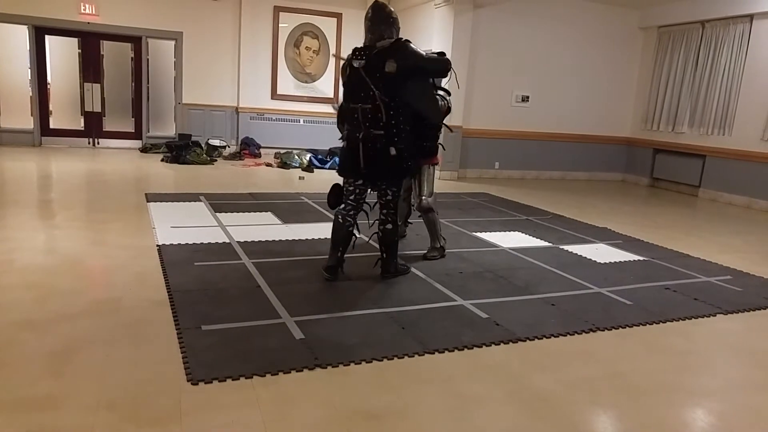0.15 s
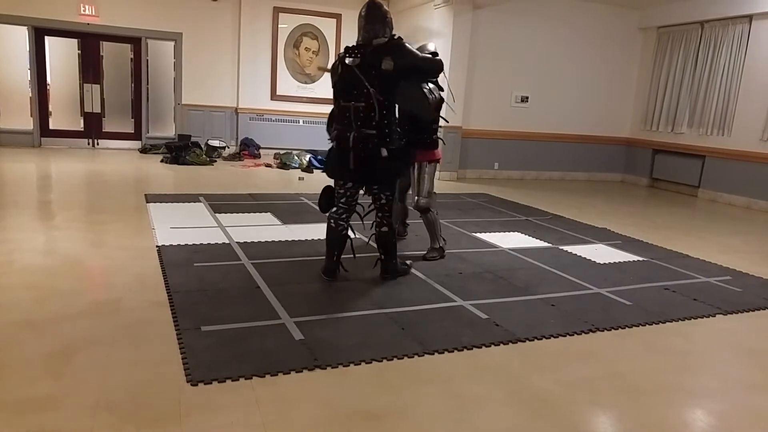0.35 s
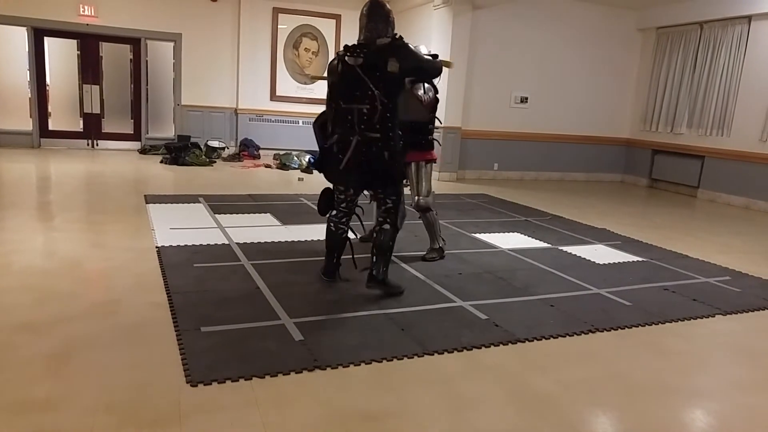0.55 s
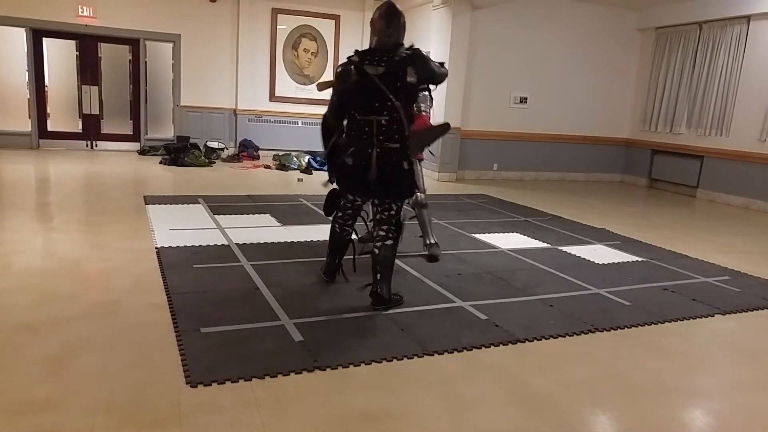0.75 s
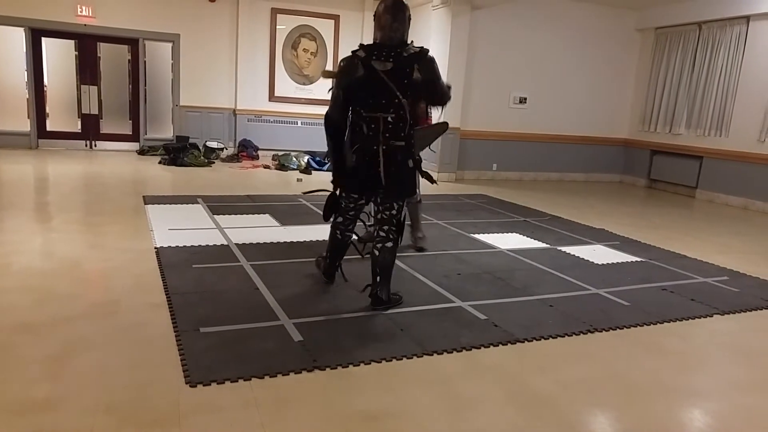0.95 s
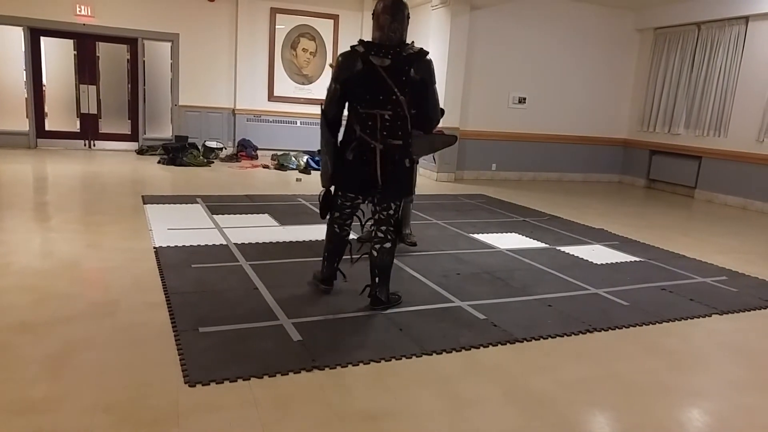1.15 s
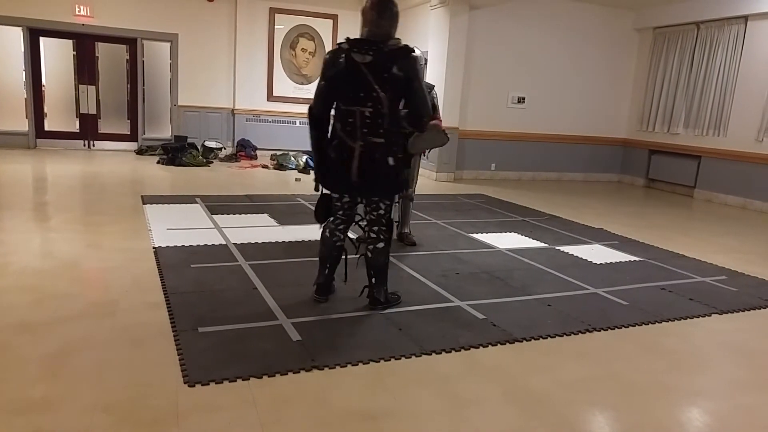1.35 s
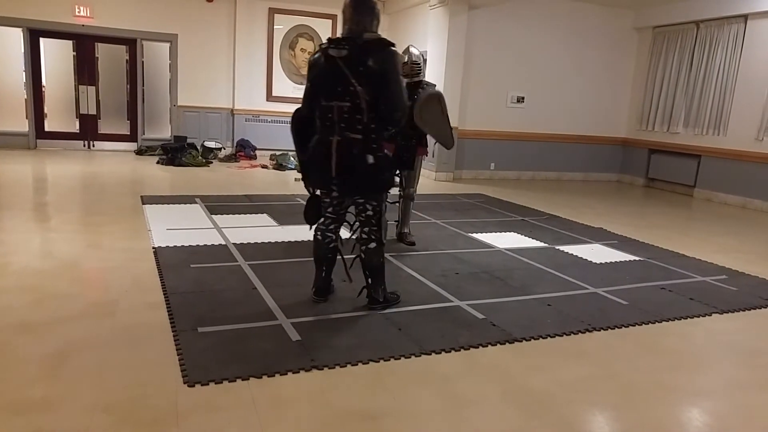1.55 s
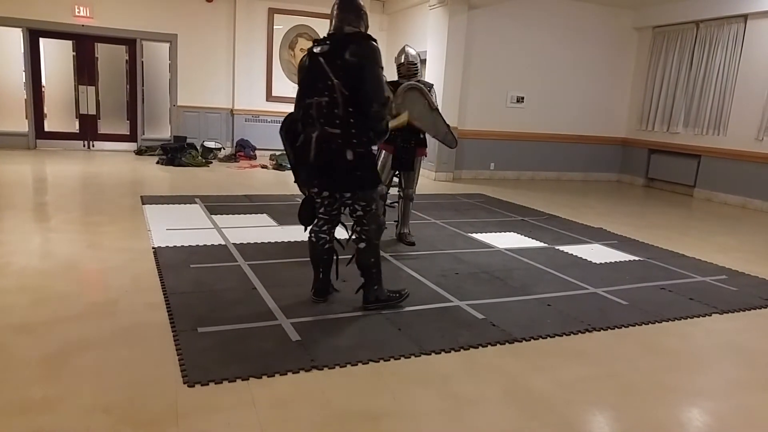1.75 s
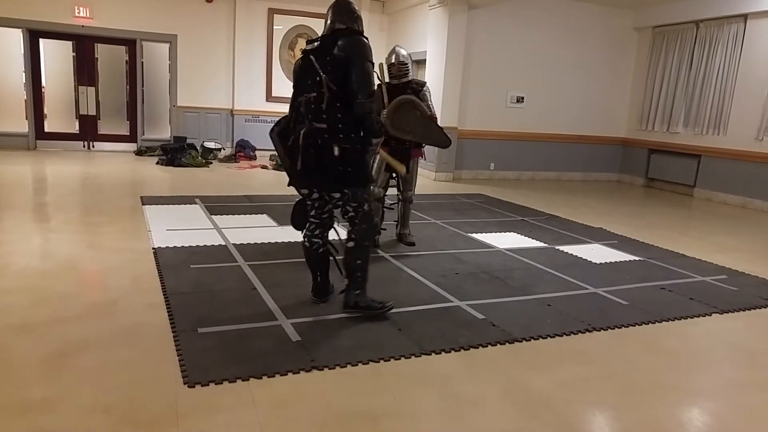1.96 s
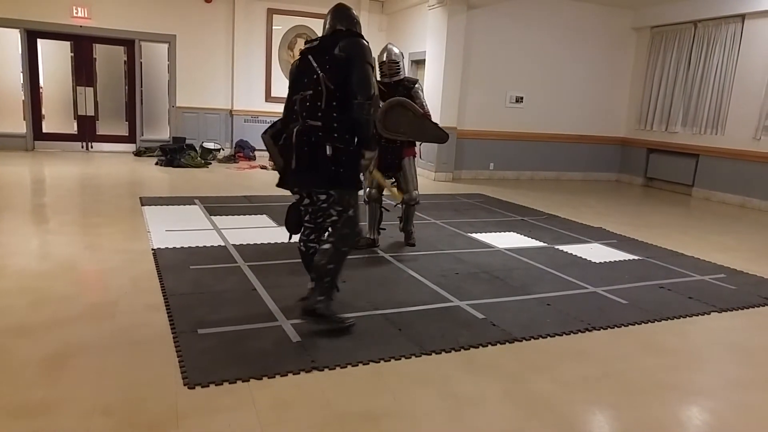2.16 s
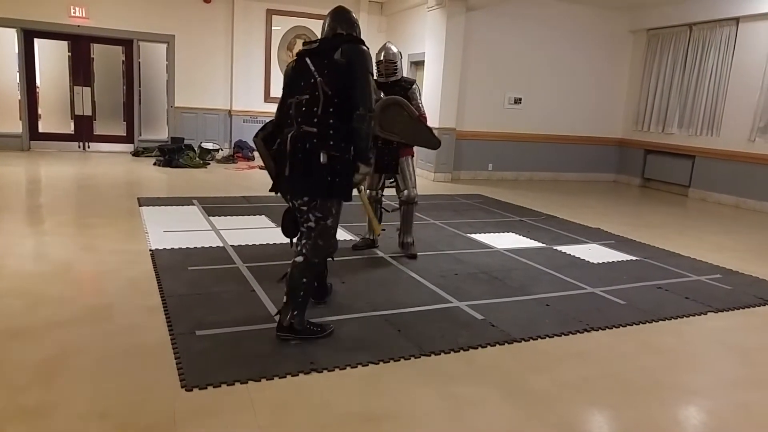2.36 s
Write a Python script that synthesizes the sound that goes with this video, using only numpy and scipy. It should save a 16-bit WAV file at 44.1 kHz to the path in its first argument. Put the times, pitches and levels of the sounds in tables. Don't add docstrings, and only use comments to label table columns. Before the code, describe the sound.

Steel armour clanks under blows with dull thuds, the hardest crash coming early and overloading the microphone; a second cluster follows near one second, then lighter clinks and loose rattling in a reverberant hall.

```python
import sys
import numpy as np
from scipy import signal
from scipy.fft import rfft, irfft
from scipy.io import wavfile

SR = 44100
rng = np.random.default_rng(int(sys.argv[2]) if len(sys.argv) > 2 else 0)


def transcribe(u):
    v = np.clip(np.atleast_2d(u).T, -1, 1)
    q = np.round(v * 32767).astype(np.int16)
    wavfile.write(sys.argv[1], SR, q)


def level_to_linear(level):
    exponent = np.asarray(level, float) / 20
    return 10 ** exponent


N = 105840
LEAD = SR // 2
EARLIER_S = -0.049


def rms_one(x):
    return x / np.sqrt(np.mean(x ** 2) + 1e-20)


def at_hz(points, hz):
    points = np.array(points)
    return np.interp(np.log(hz + 1), np.log(points[:, 0]), points[:, 1])


def add(out, s, sound):
    i = int(s * SR) + LEAD
    out[i:i + len(sound)] += sound[:len(out) - i]


def modes(hz, gain, t60, length):
    t = np.arange(length) / SR
    decay = level_to_linear(-60 * t / t60[:, None])
    return gain @ (np.sin(2 * np.pi * hz[:, None] * t) * decay)


def stereo_bands(length, shape):
    # pitch_hz, correlation
    likeness = [(60, 0.88), (180, 1), (550, 0.67), (1650, 0.039), (4970, 0.089), (15000, 0.055)]
    edges = 25 * 2 ** np.arange(0, 9.5, 1 / 3)
    white = rng.standard_normal((2, 2, length))
    out = 0
    for k, (low, high) in enumerate(zip(edges, edges[1:])):
        centre = np.sqrt(low * high)
        band = signal.butter(2, [low, high], "band", fs=SR, output="sos")
        mid, side = signal.sosfilt(band, white[k % 2])
        alike = np.clip(at_hz(likeness, centre), -1, 1)
        common = np.sqrt(1 + alike) * mid
        opposed = np.sqrt(1 - alike) * side * [[1], [-1]]
        out = out + shape(centre) * (common + opposed)
    return out


def steel_crash(noise, t, top_hz, contact, clear_db):
    t60_s, level_db, focus_db, low_hz = 0.018, 3, 4, 1800
    octave = top_hz * 2 ** np.array([-0.5, 0.5])
    wide = signal.lfilter(*signal.butter(1, low_hz, "high", fs=SR), noise)
    near = signal.lfilter(*signal.butter(1, octave, "band", fs=SR), noise)
    roughness = level_to_linear(3.74 * np.repeat(noise[:138], 40)[:len(t)])
    decay = level_to_linear(level_db - 60 * np.maximum(t - contact / 2, 0) / (t60_s + 2 * contact))
    return (wide + level_to_linear(focus_db + clear_db) * near) * roughness * decay


def steel():
    # start_s, level_db (peak), pitch_hz (loudest mode), contact_s, clearness_db
    blow_table = [(.0865, -8.5, 5000, 0.016, 19), (.2095, -1.5, 6200, 0.022, -2),
                  (.2533, -5, 5650, 0.0049, 6), (.3452, 10.5, 7800, 0.021, 8), (.364, 5, 4040, 0.015, 3),
                  (.398, 1, 5150, 0.017, 9), (.8605, -2.5, 6300, 0.014, -4), (.9135, -7, 6590, 0.0038, -2),
                  (1.1325, -9, 5460, 0.04, 0), (1.169, -4, 8900, 0.0043, -14),
                  (1.357, -4, 6050, 0.019, -3.5), (1.469, -6.5, 5500, 0.025, -7),
                  (1.7995, -11, 9100, 0.03, -6), (2.3065, -11, 8600, 0.0034, 2),
                  (2.3325, -6.5, 6700, 0.0021, -24), (2.3545, -13, 5740, 0.011, 4)]
    # start_s, level_db (peak), pitch_hz (loudest mode), clearness_db
    clink_table = [(0.0911, -3.5, 5150, -4), (0.1017, -17, 4960, -3), (0.113, -18, 5630, -8),
                   (0.1693, -10, 6700, -5), (0.3, -8, 9500, 11), (0.3465, 9.5, 4880, 6),
                   (0.3844, -23, 5800, -5), (0.467, -5.5, 5500, -3), (0.517, -5, 6230, 0),
                   (0.866, -5, 6860, -14), (0.965, -15, 8700, 18), (1.1544, -36, 6270, -21),
                   (1.2407, -15, 5600, 5), (1.2638, -14, 9300, -7), (1.366, -23, 9500, 5),
                   (1.438, -9.5, 5830, 5), (1.488, -7, 5430, 10), (1.515, -7, 5700, -9),
                   (1.6394, -29, 3630, -15), (1.7504, -20, 5530, -12), (1.761, -18.5, 6170, 1),
                   (1.8188, -14.5, 9200, -11), (1.839, -20.5, 9300, 12), (1.8858, -14.5, 5340, -6),
                   (1.976, -19.5, 9000, 7), (2.0098, -20.5, 8400, 10), (2.019, -21.5, 8550, 0),
                   (2.09, -23.5, 4700, -14), (2.1885, -28, 9300, 8), (2.2124, -21, 9300, -12),
                   (2.222, -19, 5500, -1), (2.235, -20, 6000, -8), (2.2683, -22.5, 8900, -3),
                   (2.2812, -19, 8350, 8), (2.383, -13, 9500, 5)]
    t60_s, focus_oct, skirt_db, steel_db = 0.015, 0.48, -42, -5.5
    out = np.zeros(N + LEAD)
    t = np.arange(SR // 8) / SR
    rows = [(EARLIER_S, -1, 8800, 0.01, -6)] + list(blow_table)
    rows += [(s, db, hz, 0.003, clear_db) for s, db, hz, clear_db in clink_table]
    draws = rng.random(size=(len(rows), 3, 24))
    noises = rng.standard_normal((len(rows), len(t)))
    for (s, db, top_hz, contact, clear_db), (u, v, w), noise in zip(rows, draws, noises):
        hz = np.append(top_hz, 3000 * 2 ** (3.2 * (np.arange(23) + u[1:]) / 23))
        focus = np.exp(-0.5 * (np.log2(hz / top_hz) / focus_oct) ** 2)
        gain = (focus + level_to_linear(skirt_db)) * level_to_linear(-10 * np.append(0, v[1:])) * np.sign(w - 0.5)
        mode_t60 = t60_s * (0.58 + 0.74 * w ** 2) * np.sqrt(6000 / hz)
        ring = modes(hz, gain, mode_t60, len(t))

        touches = np.zeros(SR // 20)
        touch_at = np.clip(contact, 0, 0.04) * SR * np.append(0, u[:8])
        touches[touch_at.astype(int)] = (0.49 + v[:9]) / 3
        clear = level_to_linear(clear_db) * signal.fftconvolve(ring, touches)[:len(t)]

        onset = np.minimum(t * 2000, 1)
        hit = clear + steel_crash(noise, t, top_hz, contact, clear_db) * onset
        add(out, s, hit / np.abs(hit).max() * level_to_linear(db + steel_db))
    return out


def thuds():
    # start_s, level_db (peak), pitch_hz, width_oct
    thud_table = [(-.04, -10, 840, 0.36), (.10, -16, 846, 0.48), (.17, -19, 720, 0.26),
                  (.208, -17, 765, 0.22), (.347, -10, 296, 0.73), (.3465, -3, 606, 0.99),
                  (.36, -29, 1620, 1.2), (.372, -10.5, 805, 0.65), (.385, -19, 226, 0.51),
                  (.398, -15, 1150, 1.47), (.468, -17.5, 310, 0.46), (.472, -15, 544, 0.2),
                  (.535, -33.5, 577, 0.43), (.8565, -12, 905, 0.59), (.862, -13, 273, 0.44),
                  (.891, -14.5, 890, 0.4), (.911, -10, 810, 0.91), (1.033, -26, 780, .4),
                  (1.2, -23, 820, 0.62), (1.357, -17, 755, 0.21), (1.36, -26, 333, 0.21),
                  (1.439, -23.5, 750, 0.17), (1.525, -32, 720, 0.38), (1.755, -32, 1130, 0.2),
                  (1.8, -25.5, 855, 0.27), (1.814, -30, 370, 0.12), (2.307, -23, 820, 0.18),
                  (2.333, -20.5, 1380, 0.1), (2.336, -27, 326, 0.39), (2.358, -28, 403, 0.18)]
    t60_s, thud_db, rise_s = 0.019, -3.5, 0.00084
    out = np.zeros(N + LEAD)
    t = np.arange(SR // 4) / SR
    rows = [(EARLIER_S, -10, 750, 0.9)] + list(thud_table)
    draws = rng.random(size=(len(rows), 2, 30))
    for (s, db, pitch_hz, width), (u, v) in zip(rows, draws):
        spread = 2 * (np.arange(30) + u) / 30 - 1
        hz = pitch_hz * 2 ** (2 * width * spread)
        gain = (1.4 + v) * np.exp(-(np.log2(hz / pitch_hz) / width) ** 2)
        hit = modes(hz, gain, t60_s * np.sqrt(700 / hz), len(t)) * np.minimum(t / rise_s, 1)
        add(out, s, hit / np.abs(hit).max() * level_to_linear(db + thud_db))
    return out


def footfalls():
    # start_s, level_db (peak), pitch_hz
    step_table = [(0.022, -10, 192), (0.132, -15.5, 158), (0.5, -11, 129.5), (0.559, -47, 119),
                  (0.857, -18, 127.4), (0.961, -25, 190), (1.078, -18, 207), (1.299, -44, 205),
                  (1.547, -21, 296), (1.757, -28, 188), (2, -33, 125), (2.272, -49, 222)]
    step_db, rise_s = -13.0, 0.0094
    out = np.zeros(N + LEAD)
    t = np.arange(SR // 4) / SR
    for s, db, pitch_hz in step_table:
        hz = pitch_hz * np.array([0.8, 1, 1.35])
        ring = modes(hz, np.array([0.5, 1, -0.5]), 14 / hz, len(t))
        add(out, s, level_to_linear(db + step_db) * ring * np.minimum(t / rise_s, 1))
    return out


def rattle():
    # start_s, level_db
    motion_table = [(0.0, -31), (0.19, -34.5), (0.41, -27), (0.65, -30.5), (1.211, -36.5), (1.38, -34),
                    (1.59, -39.5), (1.85, -40.5), (2.04, -48.5), (2.26, -46.5), (2.4, -36)]
    ticks_per_s, rattle_db, ring_cycles = 3000, -5, 11.7
    s, db = np.transpose(motion_table)
    level = level_to_linear(np.interp(np.arange(-LEAD, N) / SR, s, db) + rattle_db)
    sizes = level_to_linear(5.16 * np.minimum(rng.exponential(1, N + LEAD), 4))
    sizes = sizes * rng.choice([-1, 1], N + LEAD)
    born = rng.random(N + LEAD) < ticks_per_s / SR
    dealt = rng.integers(0, 40, N + LEAD)
    out = 0
    for k, hz in enumerate(np.geomspace(2600, 15000, 40)):
        r = level_to_linear(-60 * hz / ring_cycles / SR)
        w = 2 * np.pi * hz / SR
        ticks = sizes * born * (dealt == k) + 1e-18
        out = out + signal.lfilter([0, np.sin(w)], [1, -2 * r * np.cos(w), r * r], ticks)
    return level * rms_one(out)


def hall(x):
    # pitch_hz, t60_s
    decay_table = [(100, 0.52), (300, 0.56), (800, 1), (2000, 1), (5000, 0.72), (9000, 0.47), (14000, 0.34)]
    hall_db, low_extra_db = -1.5, 2.5
    gap_s, build_s = 0.005, 0.014
    right_lag_s, echo_s, echo_db = 0.00008, 0.0025, -1.5
    t = np.arange(int(1.5 * SR)) / SR
    build = np.clip((t - gap_s) / build_s, 0, 1) ** 0.5

    def decay(hz):
        return level_to_linear(low_extra_db * (hz < 1200) - 60 * t / at_hz(decay_table, hz))

    tail = build * stereo_bands(len(t), decay)
    tail = tail * level_to_linear(hall_db) / np.sqrt(np.sum(tail ** 2) / 2)
    tail[0, 0] += 1
    tail[1, int(right_lag_s * SR)] += 1
    tail[[0, 1], [int(echo_s * SR), int(1.1 * echo_s * SR)]] += level_to_linear(echo_db)
    return signal.fftconvolve(x[None], tail, axes=1)[:, LEAD:LEAD + N]


def background():
    # pitch_hz, level_db (per Hz)
    noise_table = [(24, -40), (40, -2.5), (348, -2.5), (500, -10), (637, -1), (2500, -16), (5000, -41),
                   (12000, -17)]
    return level_to_linear(-47) * rms_one(stereo_bands(N, lambda hz: level_to_linear(at_hz(noise_table, hz))))


def jolt():
    start_s, t60_s, rise_s, level_db = 0.35, 0.12, 0.0067, -6.5
    hz = 47 * np.array([0.64, 1.3, 1.73, 2.9, 4.37])
    gain = level_to_linear(level_db) * np.array([0.8, 0.18, -0.4, 0.5, -0.3])
    mode_t60 = t60_s * np.array([1.14, 2.3, 1.2, 1.1, 0.79])
    t = np.arange(SR // 4) / SR
    out = np.zeros(N + LEAD)
    add(out, start_s, modes(hz, gain, mode_t60, len(t)) * np.minimum(t / rise_s, 1))
    return out[LEAD:] * [[0.05], [1]]


def scene():
    noise = background()
    air = hall(steel() + thuds() + footfalls() + rattle()) + noise
    low_cut = signal.butter(2, 88, "high", fs=SR, output="sos")
    return signal.sosfilt(low_cut, air) + jolt()


def band_limit(x):
    return signal.sosfilt(signal.butter(12, 15620, fs=SR, output="sos"), x)


def record(dry):
    # pitch_hz, level_db
    left_response = [(150, 1), (350, 6), (800, 5.5), (1400, 3), (4000, 1), (6400, 2.5), (8800, 12.5),
                     (14000, -7.5)]
    right_response = [(150, 1.5), (350, 5), (800, 5), (1400, 2), (4000, 2.5), (6200, 12), (9200, 12),
                      (14000, -23.5)]
    clip_top = 0.94
    hz = np.arange(N // 2 + 1) * SR / N
    notch = -7 * np.exp(-0.5 * ((hz - 7740) / 590) ** 2)
    dip = -7.5 * np.exp(-0.5 * ((hz - 478) / 71.5) ** 2)
    response = np.array([at_hz(left_response, hz), at_hz(right_response, hz)])
    colour = level_to_linear(response + notch + dip)
    heard = irfft(rfft(dry, axis=1) * colour, N, axis=1)
    return band_limit(np.clip(heard, -clip_top, clip_top))


dry = scene()
out = record(dry)
transcribe(out)
```